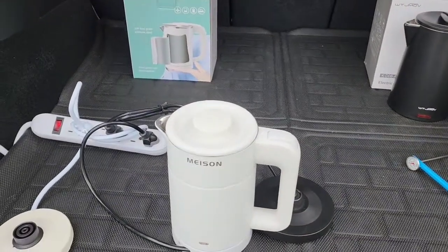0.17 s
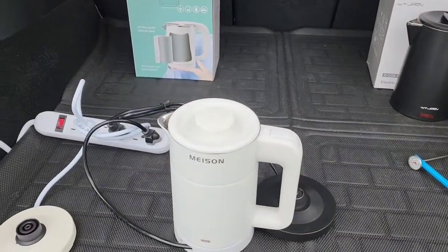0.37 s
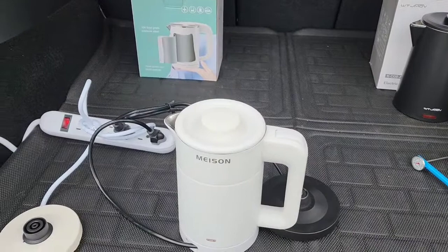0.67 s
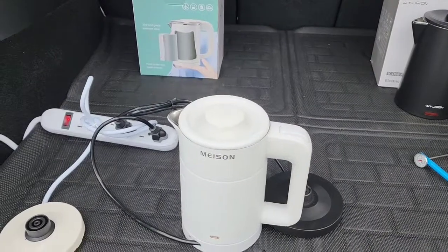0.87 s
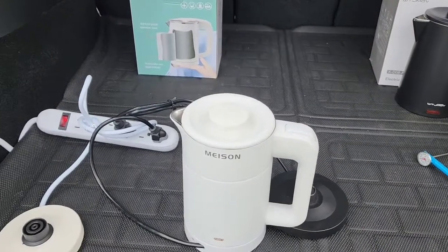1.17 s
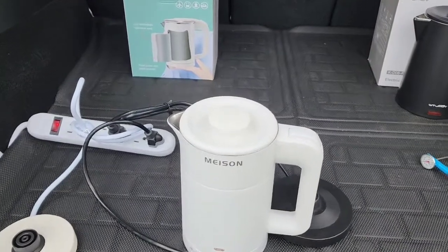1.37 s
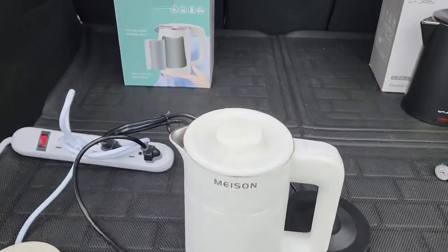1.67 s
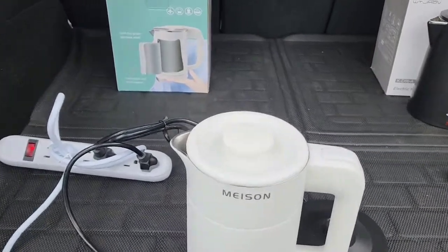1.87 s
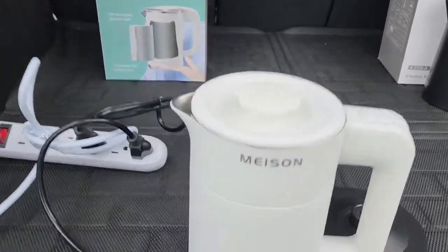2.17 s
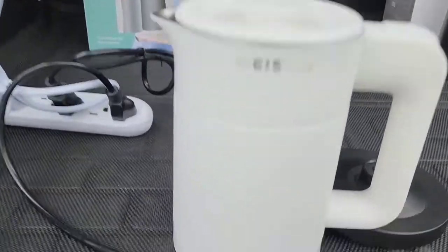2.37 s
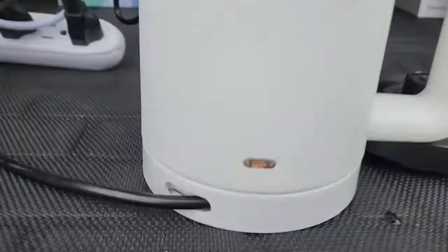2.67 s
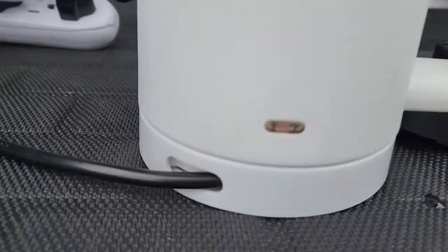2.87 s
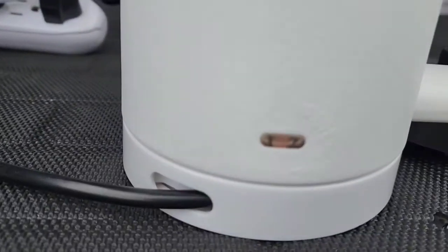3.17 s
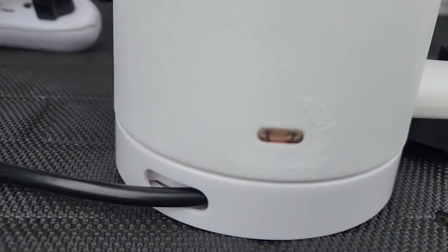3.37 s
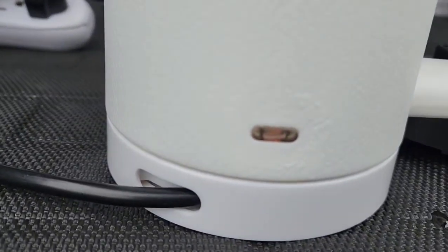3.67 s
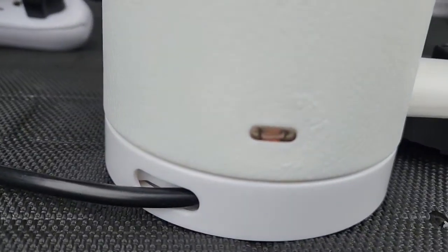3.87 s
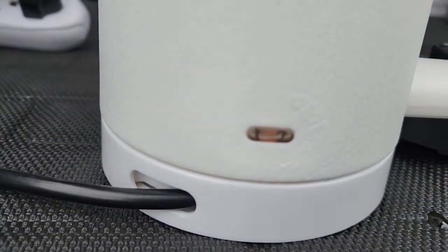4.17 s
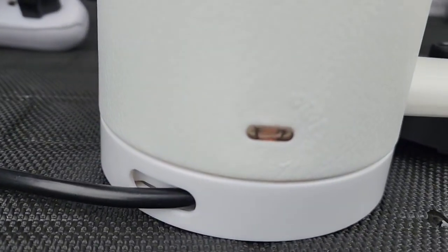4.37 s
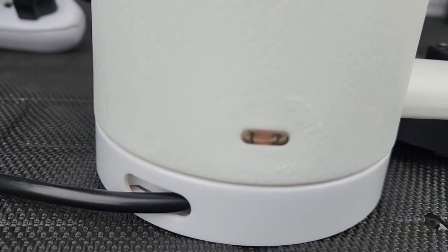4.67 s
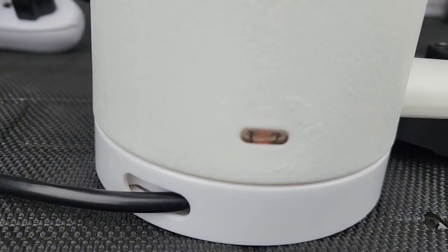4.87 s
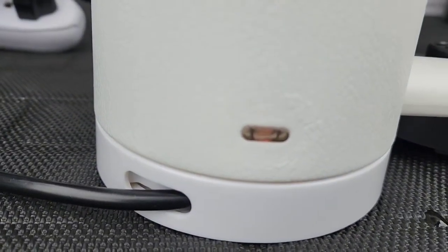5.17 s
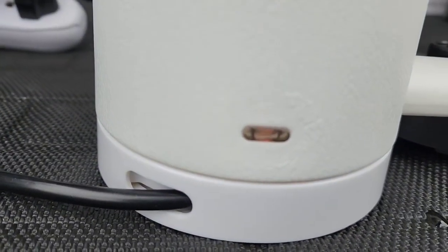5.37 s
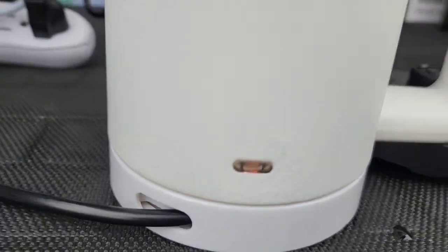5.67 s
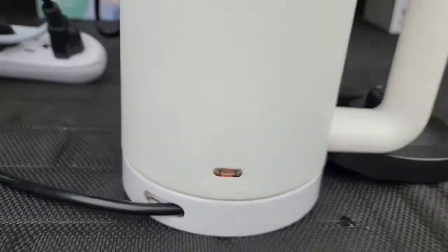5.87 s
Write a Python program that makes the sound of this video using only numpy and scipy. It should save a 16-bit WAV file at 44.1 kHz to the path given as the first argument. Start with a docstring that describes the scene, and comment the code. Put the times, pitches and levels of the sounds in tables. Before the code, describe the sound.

A small electric kettle simmers in a car boot with a dull, dense, hollow rumbling hiss, over a deep, throbbing cabin rumble and low thumps.

```python
"""The boot of a car: on its mat a small electric kettle nears the boil, and collapsing vapour bubbles
make a dense, dull simmer: random pulses coloured by lid and base, ringing the steel and the jug's hollow.
The microphone looks down on the lid, then sinks beside the base with a soft rustle of filtered noise.
A rumble and boom of shaped noise fill the cabin, with swelling sine thumps.
A thin high squeak of unsteady sines sounds once."""
import sys
import numpy as np
from scipy import signal
from scipy.fft import rfft, irfft, next_fast_len
from scipy.io import wavfile
from scipy.ndimage import uniform_filter1d, map_coordinates

SR = 44100
rng = np.random.default_rng(int(sys.argv[2]) if len(sys.argv) > 2 else 0)


def pcm_store(signal):
    """Save signal as 16-bit PCM."""
    levels = np.round(np.clip(np.atleast_2d(signal), -1, 1) * 32767)
    wavfile.write(sys.argv[1], SR, levels.astype(np.int16).T)


N = 265437


# simmer level over the lid, before its trim: start_s, level_db
SIMMER = [(0, -38.5), (0.3, -41.5), (0.55, -43.5), (0.78, -46.5), (0.95, -42.5), (1.42, -45), (1.62, -43.5),
          (1.84, -46.5), (2.0, -47), (2.18, -44.5), (2.45, -44)]
# gentle swells of the boil: middle_s, lift_db
SURGES = [(3.2, 0.3), (4.12, 1), (4.95, 1)]
SURGE_S = 0.19  # bell half width
LID_DB = 4.5  # trim on the simmer level
BASE_DB = (-56, -36.5)  # (over the lid, beside the base)


def kettle():
    """The collapses reach the air through lid, base and wall, and ring the hollow over the water."""
    lid = lid_simmer()
    base = base_simmer()
    drive = collapses(per_second=10000, spread_db=0.0, surge_db=3.5, lead_ms=0.2)
    base += plate()
    simmer_db, = curves(SIMMER)
    over_lid = moved(simmer_db + LID_DB, base_db=-64) * lid
    beside_base = moved(*BASE_DB) * base
    simmer = over_lid + beside_base + wall(simmer_db)
    ridges = boot_ridges(simmer)
    whole = simmer + amp(-7.5) * ridges + hollow(drive)
    return amp(swells(SURGES, SURGE_S)) * shaded(whole)


# simmer colour over the lid, relative levels: pitch_hz, left_db, right_db
LID = [(218, -39, -37.5), (387, -0.5, 0), (423, -11, -16), (685, -9.5, -8), (890, -9, -9),
       (1120, -18, -15.5), (1530, -19.5, -8), (2040, -23, -11), (2320, -23, -11.5), (2480, -31.5, -20.5),
       (3320, -35, -25.5), (4076, -40, -35.5), (4800, -57.5, -62.5), (8000, -90, -89.5)]


def lid_simmer():
    """Dense collapses of nearly even spread, coloured by the lid."""
    return coloured(collapses(per_second=12000, spread_db=0.5, surge_db=1.03, lead_ms=0.37), LID)


# simmer colour beside the base, relative levels: pitch_hz, left_db, right_db
BASE = [(179, -25.5, -21), (262, 2.5, 2), (473, -8.5, -5), (730, -11, -10.5), (960, -13.5, -7.5),
        (1100, -25, -17.5), (1370, -21.5, -10.5), (1580, -24, -11), (2140, -32, -16.5),
        (2580, -43.5, -28.5), (2650, -42, -23.5), (3700, -50.5, -33.5), (4316, -42, -35.5),
        (4800, -62.5, -65.5), (8000, -86, -95)]


def base_simmer():
    """Sparser, more uneven collapses, coloured by the base."""
    return coloured(collapses(per_second=6000, spread_db=2, surge_db=0.53, lead_ms=0.15), BASE)


# modes of the heated bottom, relative levels: pitch_hz, width_hz, level_db
PLATE = [(378, 5.9, -3), (594, 14, -2), (693.5, 7.4, 0), (910, 97, -8), (3150, 150, -21.5)]


def plate():
    """The heated bottom rings in its modes under the collapses, heard beside the base."""
    return amp(-13.5) * steel(PLATE) * pan(-7.5)


# standing waves over the water, at 2, 3, 4 times the column's pitch: width_hz, level_db
HOLLOW = [(28, 0.5), (19, 0), (34, -12)]
# lid modes ringing with the hollow, relative levels: pitch_hz, width_hz, level_db
LID_MODES = [(510, 52, -2.5), (612.5, 45, 6), (1005, 36, -5.5), (1290, 84, -5.5)]
# pitch of the air column, sagging a little: start_s, pitch_hz
COLUMN = [(0.45, 726), (1.0, 717.5), (2.2, 710.4)]
# level of the hollow's ring, before its trims: start_s, level_db
RINGING = [(0, -42.5), (0.2, -38), (0.47, -38), (0.59, -48.5), (0.8, -55), (1.02, -45.5), (1.16, -51.5),
           (1.28, -44), (1.43, -51.5), (1.6, -44), (1.8, -48), (1.98, -44.5), (2.18, -47), (2.42, -53.5),
           (3.9, -50), (4.45, -35), (5.1, -49)]
# its overtones beam towards the right port: pitch_hz, left_db, right_db
HOLLOW_PORTS = [(694, -0.5, 2), (1500, -5.5, 2.5), (3000, -8.5, 2)]
COLUMN_HZ = 723.5  # reference pitch, before the sag
HUM_WIDTH_HZ, HUM_DB, OVERTONES_DB = 13, -5, -3.5  # narrow fundamental; its level, the other modes' level
HOLLOW_DB, HOLLOW_SHADE_DB = 4.5, -13.5  # trims of the ring: above and below the rim
RIM_S, RIM_TAKES_S = 2.34, 0.25  # the microphone passes the rim of the jug: middle and length of the move


def hollow(drive):
    """The air over the water hums with the collapses; its pitch sags and the rim hides it from below."""
    fundamental = steadied(ringing(drive, [(COLUMN_HZ, HUM_WIDTH_HZ, 0)]), size=SR // 10)
    overtones = [((k + 2) * COLUMN_HZ, width, db) for k, (width, db) in enumerate(HOLLOW)]
    others = steadied(ringing(drive, overtones + list(LID_MODES)), size=SR // 8)
    hum = amp(HUM_DB) * fundamental + amp(OVERTONES_DB) * others
    hum = bent(hum, curves(COLUMN)[0] / COLUMN_HZ)
    gain = amp(curves(RINGING)) * moved(HOLLOW_DB, HOLLOW_SHADE_DB, RIM_S, RIM_TAKES_S)
    return gain * filtered(hum, lambda hz: amp(along(HOLLOW_PORTS, hz)))


# lower resonances of the steel wall, relative levels: pitch_hz, width_hz, level_db
WALL = [(1424, 210, 2.5), (1570, 330, -10)]
# upper resonances of the wall, relative levels: pitch_hz, width_hz, level_db
UPPER_WALL = [(1932, 40, 1), (2128, 25, -0.5), (2280, 150, -10), (2690, 200, -15.5)]
# the wall as it rings low down, near the base, relative levels: pitch_hz, width_hz, level_db
BASE_WALL = [(1250, 100, -4), (1500, 260, 0.5), (1625, 220, 0), (1914, 170, -4)]
# the upper resonances flare as the microphone passes through their beams: middle_s, lift_db
FLARES = [(.98, 5), (1.622, 8), (2.16, 11.5)]
# the lower ones flare likewise: middle_s, lift_db
LOWER_FLARES = [(.03, 6), (.27, 3.5)]
FLARE_S = 0.096  # bell half width of a flare
FLARE_FALL = .014  # steepness of the pitch slide: share of the pitch per FLARE_S, mid flare
LOWER_WALL_GROWS = 1.7  # dB for each dB of the simmer
# (over the lid, beside the base), before flares and pan; the lower wall's first also follows the simmer
LOWER_WALL_DB, UPPER_WALL_DB, BASE_WALL_DB = (-55.5, -67), (-57, -69), (-72.5, -53)


def wall(simmer_db):
    """The wall's resonances come and go as the microphone passes them."""
    t = np.arange(N) / SR
    growth_db = LOWER_WALL_GROWS * (simmer_db - np.median(simmer_db))
    lower_db = LOWER_WALL_DB[0] + growth_db + swells(LOWER_FLARES, FLARE_S)
    # the upper pitch starts high and slides down through each flare
    fall = sum(FLARE_FALL * (s - t) / FLARE_S * swells([(s, 1)], 2 * FLARE_S) for s, _ in FLARES)
    upper = moved(*UPPER_WALL_DB) * amp(swells(FLARES, FLARE_S)) * steel(UPPER_WALL, fall)
    lower = moved(lower_db, LOWER_WALL_DB[1]) * steel(WALL)
    near_base = moved(*BASE_WALL_DB) * steel(BASE_WALL)
    return (lower + upper + near_base) * pan(-15.5)


STEEL_TOP_HZ = 4200  # the plastic jacket muffles the steel above this
WALL_DRIFT, WALL_DRIFT_PER_S = .008, 7  # random detuning: share of the pitch, changes a second


def steel(modes, slide=0):
    """Collapses ring the steel in restless spurts while sloshing water detunes it."""
    drive = collapses(per_second=5000, spread_db=1.5, surge_db=0.9, lead_ms=0.21)
    ring = filtered(ringing(drive, modes), lambda hz: 1 / (1 + (hz / STEEL_TOP_HZ) ** 20))
    return bent(ring, 1 + slide + WALL_DRIFT * wobble(WALL_DRIFT_PER_S))


def collapses(per_second, spread_db, surge_db, lead_ms):
    """Bubble collapses: sharp pulses of scattered size that come in small surges."""
    happens = rng.random((2, N)) < per_second / SR
    sizes = noise() * amp(spread_db * noise())
    pulses = happens * sizes * amp(surge_db * wobble(18))
    return ports(pulses, lead_ms)


BOOT_T60_S = .1


def boot_ridges(simmer):
    """The close walls of the boot comb the upper simmer into fine, slowly shifting ridges."""
    reflections = shifting_echo(simmer, BOOT_T60_S, count=18)
    return filtered(reflections, lambda hz: hz ** 2 / (hz ** 2 + 1500 ** 2))  # thins out below 1500 Hz


# the low middle thins out as the microphone passes the side of the jug
SHADE_S, SHADE_HALF_S, SHADE_DB = 2.45, 0.18, -6.5  # middle, bell half width, depth
SHADE_HZ, SHADE_OCTAVES = 594, 0.61  # centre and half width of that dip


def shaded(x):
    """The low middle dips on the way from the lid to the base."""
    band = filtered(x, lambda hz: np.exp(-(np.log2((hz + 1) / SHADE_HZ) / SHADE_OCTAVES) ** 2))
    dip = amp(swells([(SHADE_S, SHADE_DB)], SHADE_HALF_S))
    return x + (dip - 1) * band


# spectrum of the tiny bubbles, relative: pitch_hz, level_db (per Hz)
FIZZ = [(3500, -43.5), (4900, -15.5), (5500, -4), (6150, 1), (6800, -8.5), (7600, -6.5), (8500, -17.5),
        (12000, -16), (15500, -20.5)]
FIZZ_DB = (-83, -77.5)  # (over the lid, beside the base), before echo and pan


def fizz():
    """The smallest bubbles tick faintly, clearer close to the base."""
    ticks = coloured(collapses(per_second=3000, spread_db=1.0, surge_db=0.7, lead_ms=.2), FIZZ)
    with_echo = ticks + amp(-2.0) * echo(ticks, t60=0.067)
    return moved(*FIZZ_DB) * with_echo * pan(2.5)


# a bigger bubble in the jug, before the pan: start_s, pitch_hz, peak_db, rise_s
BUBBLES = [(1.965, 840, -33.5, .0011)]


def big_bubble():
    """A bigger bubble rings as a short sine that swells and dies."""
    return bumps(BUBBLES) * pan(-1.0)


# slides of the hand, levels before pressure and pan: start_s, rise_s, hold_s, level_db
SLIDES = [(1.109, 0.096, .05, -83), (1.879, .24, .22, -72.5), (2.322, 0.013, .23, -66.5),
          (5.596, 0.28, .1, -80)]
# the hand presses harder for a moment: middle_s, lift_db
TOUCHES = [(2.343, 5), (2.53, 1.5), (2.68, 2.5)]
# spectrum of the rub, relative: pitch_hz, level_db (per Hz)
RUB = [(1500, -14.5), (2600, 4.5), (4300, 5.5), (5200, -10), (6100, -1), (7600, 0.5), (8500, -3.5),
       (10600, 1.5), (12700, 2), (15500, -7.5)]
TOUCH_S = .02  # bell half width of a touch
SLIDE_FADE_DB_PER_S = 28  # each slide dies away as the hand comes to rest


def rustle():
    """A hand slides softly near the left port: rubbing noise under stroke and pressure envelopes."""
    t = np.arange(N) / SR
    strokes = []
    for s, rise, hold, db in SLIDES:
        fade_db = SLIDE_FADE_DB_PER_S * np.maximum(t - s - rise - hold, 0)
        strokes.append(np.clip((t - s) / rise, 0, 1) * amp(db - fade_db))
    pressure_db = swells(TOUCHES, TOUCH_S) + 0.9 * wobble(60)
    return np.max(strokes, axis=0) * amp(pressure_db) * coloured(noise(), RUB) * pan(10.0)


# tones of the squeak, before echo and pan: start_s, pitch_hz (centre), level_db, length_s
SQUEAKS = [(0.538, 8520, -64.5, 0.094), (0.552, 8470, -63, 0.066), (0.536, 8880, -67, .09),
           (0.575, 8920, -66.5, .06), (0.592, 9570, -73.5, 0.068), (0.64, 8580, -66.5, .05),
           (0.67, 9700, -78, 0.037)]


def squeak():
    """A few thin, unsteady high tones with a short echo."""
    t = np.arange(N) / SR
    tones = np.zeros((1, N))
    for s, hz, db, length in SQUEAKS:
        swell = np.sin(np.pi * np.clip((t - s) / length, 0, 1))
        pitch = hz * (1 + 0.012 * wobble(280))
        tones += amp(db) * swell * np.sin(2 * np.pi * np.cumsum(pitch) / SR)
    return (tones + amp(1.5) * echo(tones, t60=0.25)) * pan(8.7)


# spectrum of the rumble, relative: pitch_hz, level_db (per Hz)
RUMBLE = [(10, -41.5), (20, -16.5), (30, -7), (48, -1), (65, 1), (90, 0.2), (112, -0.73), (135, -14),
          (170, -22.5), (400, -38), (1000, -100)]
# spectrum of the boom, relative: pitch_hz, level_db (per Hz)
BOOM = [(80, -35), (122, 1.5), (145, -4), (180, 0), (220, -1.5), (260, -6), (330, -14.5), (500, -23),
        (1500, -97.5)]
# the boom swells and sags: middle_s, lift_db
BOOM_SWELLS = [(.27, 2), (.58, 2.5), (.69, 3.5), (.78, -4.5), (1.05, 3), (3.06, 1.5), (3.78, -4)]
BOOM_SWELL_S = .06  # bell half width of a swell
RUMBLE_DB, RUMBLE_DB_PER_S, RUMBLE_WANDER_DB = -25, -0.29, -0.5  # start level, slow ebb, random unrest
BOOM_DB = (-30, -36)  # (over the lid, beside the base), before the swells
BOOM_S, BOOM_TAKES_S = 2.31, 1.4  # the boom thins out on the way down: middle and length


def cabin():
    """A deep, throbbing rumble fills the car; its upper boom is stronger away from the mat."""
    t = np.arange(N) / SR
    # long waves reach both ports nearly alike
    drone = coloured(rng.standard_normal(N) + amp(-21.0) * noise(), RUMBLE)
    # the drone comes in quick lumps and gaps but keeps its strength from one throb to the next
    drone = steadied(drone * amp(RUMBLE_WANDER_DB * wobble(28)), size=SR // 8)
    boom = coloured(ports(noise(), lead_ms=0.035), BOOM) * amp(swells(BOOM_SWELLS, BOOM_SWELL_S))
    rumble = amp(RUMBLE_DB + RUMBLE_DB_PER_S * t) * drone
    return rumble + moved(*BOOM_DB, BOOM_S, BOOM_TAKES_S) * boom


# the strongest low thumps in the rumble: start_s, pitch_hz, peak_db, rise_s
BUMPS = [(.04, 97, -17.5, 0.01), (.092, 94.6, -13.5, .008), (.171, 91.3, -10.5, 0.0076),
         (.253, 102.4, -16, 0.01), (.44, 153, -18, 0.011), (.556, 80, -17, .008), (1.055, 86.5, -19, 0.026),
         (1.263, 70, -16.5, 0.0089), (1.414, 83, -18.5, 0.0096), (1.474, 98, -20, 0.0099),
         (1.932, 91, -13, 0.0083), (2.125, 96.5, -14, 0.0072), (2.225, 79.2, -11.5, 0.007),
         (2.682, 89, -20, 0.0074), (2.785, 83, -18.5, 0.0054), (3.128, 69.4, -14, 0.008),
         (3.894, 72, -17, 0.0097), (4.012, 88, -21.5, 0.012), (4.144, 91.3, -17, 0.01),
         (4.69, 66.7, -17, .01), (5.331, 88, -13.5, 0.0081), (5.82, 81.5, -15, 0.008)]


def thumps():
    """Low thumps stand out of the rumble as brief swelling sines, equal in both ports."""
    return bumps(BUMPS)


def hiss():
    """The microphone's own hiss: faint white noise."""
    return amp(-85.0) * noise() * pan(3.8)


def bumps(rows):
    """Each low thump or big bubble is a few cycles that swell and die."""
    out = np.zeros(N)
    for s, hz, db, rise in rows:
        age = np.maximum(np.arange(N) / SR - s, 0)
        envelope = age / rise * np.exp(1 - age / rise)
        out += amp(db) * envelope * np.sin(2 * np.pi * hz * age)
    return out


SINK_S, SINK_TAKES_S = 2.39, 1.58  # the microphone sinks from lid to base: middle and length of the move


def moved(lid_db, base_db, middle=SINK_S, takes=SINK_TAKES_S):
    """Gain of a sound as the microphone glides from over the lid to beside the base."""
    way = np.clip((np.arange(N) / SR - middle) / takes + .5, 0, 1)
    low = np.sin(np.pi / 2 * way) ** 2
    return np.sqrt((1 - low) * amp(lid_db) ** 2 + low * amp(base_db) ** 2)


RETREAT_S, RETREAT_DB_PER_S = 5.13, -2.5  # the microphone backs away from the base


def retreat():
    """The kettle fades a little as the microphone backs away."""
    return amp(RETREAT_DB_PER_S * np.maximum(np.arange(N) / SR - RETREAT_S, 0))


# how much the two ports share: pitch_hz, likeness (0 to 1)
ALIKE = [(100, 0.8), (200, 0.92), (350, 0.88), (620, 1), (900, 0.83), (1100, 0.31), (1400, 0.29),
         (1900, 0.77), (2400, 0.27), (3100, 0.64), (4500, 0.11), (8000, 0.092)]


def ports(pair, lead_ms):
    """Two microphone ports: mostly alike below about 1 kHz, less alike in the treble, the left earlier."""
    m = next_fast_len(N + SR // 2)
    hz = np.fft.rfftfreq(m, 1 / SR)
    turn = np.arccos(np.clip(along(ALIKE, hz)[0], -.998, .998)) / 2
    mid, side = rfft(pair, m) * np.array([np.cos(turn), np.sin(turn)])
    lead = np.exp(1j * np.pi * hz * lead_ms / 1000)  # half the lead on each port
    return irfft(np.array([(mid + side) * lead, (mid - side) / lead]), m)[:, :N]


def pan(left_db):
    """Left and right gains for a level difference."""
    return amp([[left_db / 2], [-left_db / 2]])


def echo(x, t60):
    """A diffuse tail of fading noise for each port, the left one of unit energy."""
    age = np.arange(SR // 2) / SR
    tail = rng.standard_normal((2, len(age))) * amp(-60 * age / t60)
    return signal.fftconvolve(x, tail / np.linalg.norm(tail[0]), axes=1)[:, :N]


def shifting_echo(x, t60, count):
    """An echo whose fine pattern changes count times as the microphone drifts."""
    hop = N // count
    out = np.zeros((2, N + SR))
    for k in range(count + 1):
        start, end = max((k - 1) * hop, 0), min((k + 1) * hop, N)
        window = np.cos(np.pi / 2 * (np.arange(start, end) / hop - k))
        part = echo(x[:, start:end] * window, t60)
        out[:, start:start + part.shape[1]] += part
    return out[:, :N]


def resonance(f, centre, width):
    """Response of one resonance, unity at its centre, with steepened skirts."""
    peak = 1j * f * width / (centre ** 2 - f ** 2 + 1j * f * width)
    return peak / (1 + ((f - centre) / (5 * width)) ** 2)


def ringing(x, modes):
    """x through a set of resonances, at rms 1."""
    return unit(filtered(x, lambda f: sum(amp(db) * resonance(f, hz, width) for hz, width, db in modes)))


def bent(x, ratio):
    """x with its pitch multiplied by a curve that stays near 1."""
    clock = np.cumsum(ratio)
    return np.array([map_coordinates(port, [clock], mode="mirror") for port in x])


def steadied(x, size):
    """x at an even strength, keeping only flutter quicker than size samples."""
    power = uniform_filter1d(np.mean(x ** 2, axis=0), size=size)
    return x / np.sqrt(abs(power) + 1e-6)


def swells(rows, half_s):
    """Bell-shaped lifts in dB, one for each (s, dB) row; half_s from the middle they are down to 1/e."""
    t = np.arange(N) / SR
    return sum(db * np.exp(-((t - s) / half_s) ** 2) for s, db in rows)


def wobble(rate):
    """A smooth random curve, rate knots a second."""
    return map_coordinates(rng.standard_normal(int(N * rate / SR) + 4), [np.arange(N) * rate / SR])


def noise():
    """Two unrelated white noises."""
    return rng.standard_normal((2, N))


def coloured(x, spectrum):
    """x shaped by a spectrum, at rms 1."""
    return unit(filtered(x, lambda hz: amp(along(spectrum, hz))))


def filtered(x, response):
    """x times a complex response of frequency."""
    m = next_fast_len(N + SR // 2)
    return irfft(rfft(x, m) * response(np.fft.rfftfreq(m, 1 / SR)), m)[..., :N]


def along(points, hz):
    """Each column of (Hz, value, ..) rows, read on a log axis."""
    f, *cols = np.transpose(points)
    return np.array([np.interp(np.log(hz + 1), np.log(f + 1), c) for c in cols])


def curves(rows):
    """One value per sample for each column after the time."""
    s, *cols = np.transpose(rows)
    return np.array([np.interp(np.arange(N) / SR, s, c) for c in cols])


def amp(db):
    """Decibels to gain."""
    return 10 ** (np.asarray(db) / 20)


def unit(x):
    """Scale to rms 1."""
    return x / np.sqrt(np.mean(x ** 2) + 1e-20)


def scene():
    """Kettle, small sounds and cabin over the microphone's own hiss."""
    boiling = retreat() * (kettle() + fizz()) + big_bubble()
    handling = rustle() + squeak()
    return boiling + handling + cabin() + thumps() + hiss()


TOP_HZ = 15720  # band limit


def record(dry):
    """The recorder opens and closes softly and keeps nothing above its band limit."""
    gate = signal.windows.tukey(N, .003)
    return filtered(dry * gate, lambda hz: hz < TOP_HZ)


dry = scene()
out = record(dry)
pcm_store(out)
```